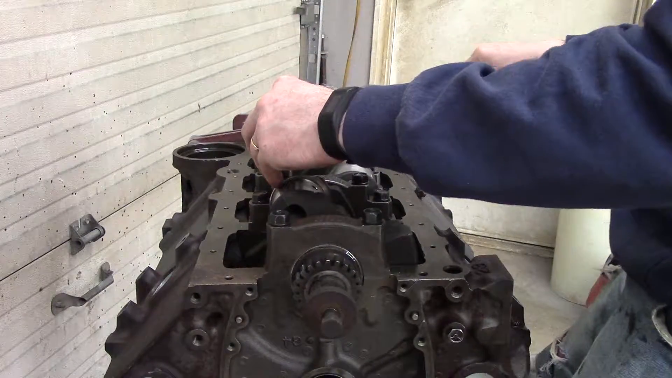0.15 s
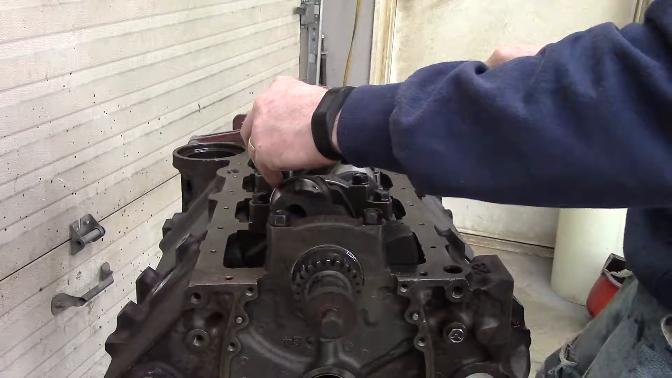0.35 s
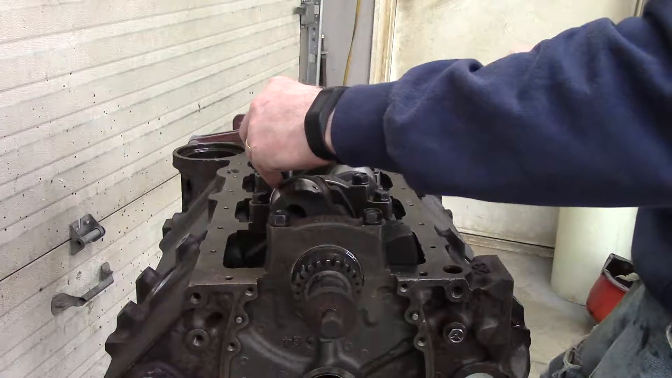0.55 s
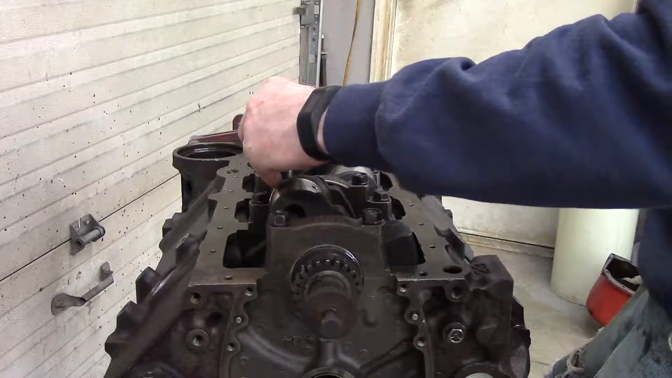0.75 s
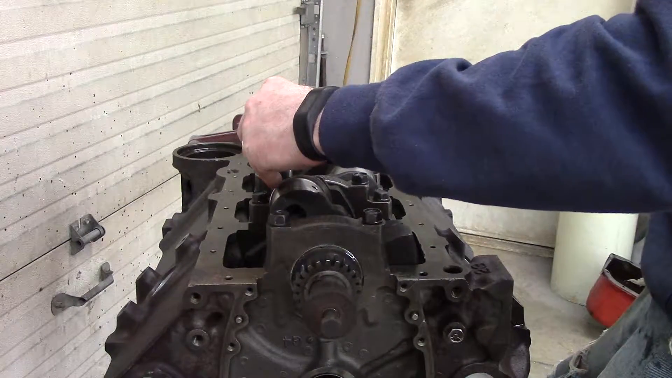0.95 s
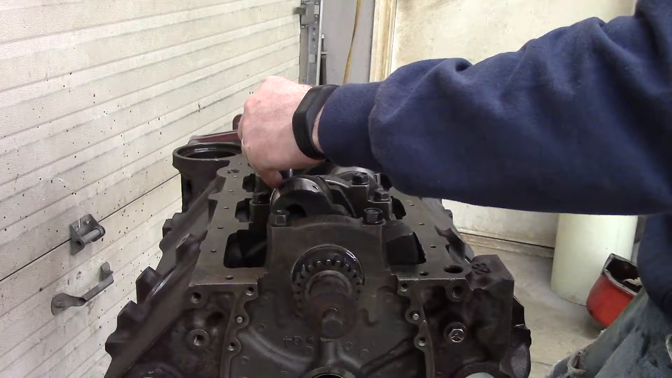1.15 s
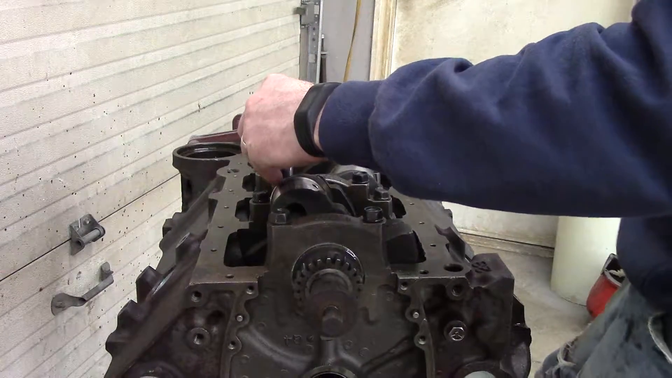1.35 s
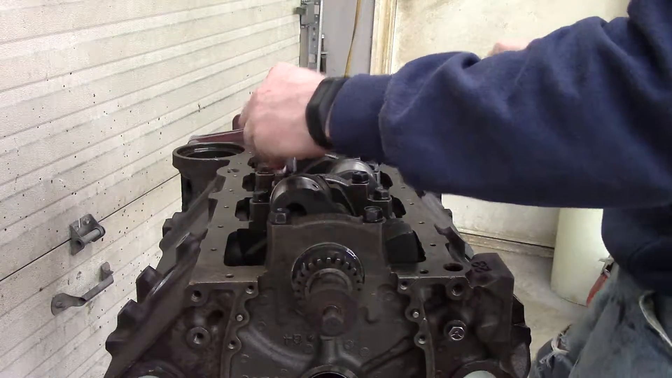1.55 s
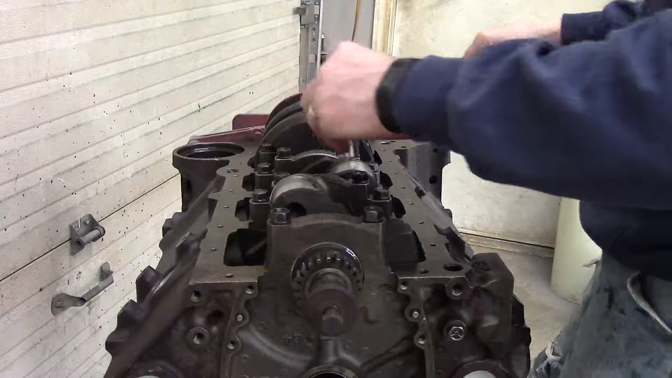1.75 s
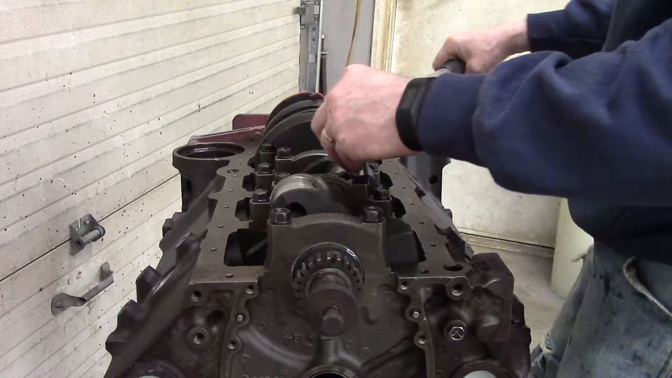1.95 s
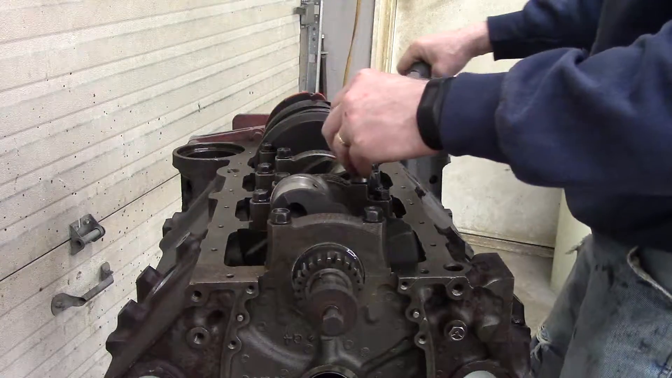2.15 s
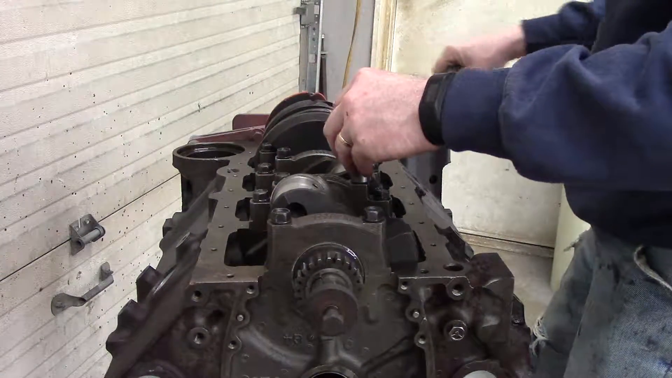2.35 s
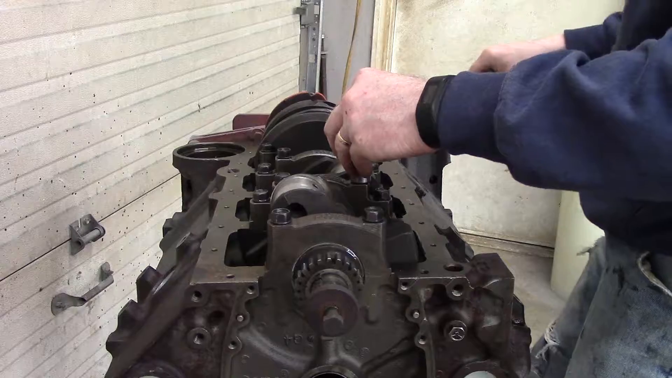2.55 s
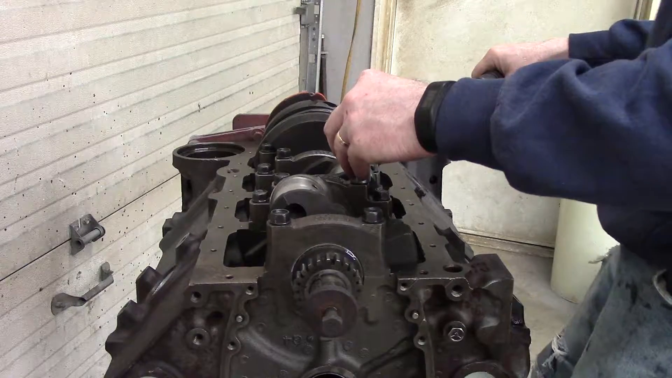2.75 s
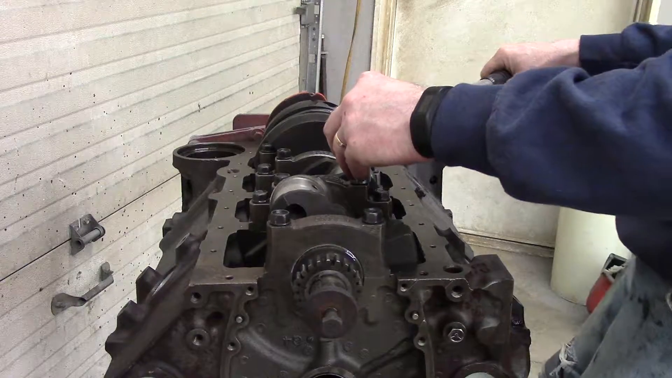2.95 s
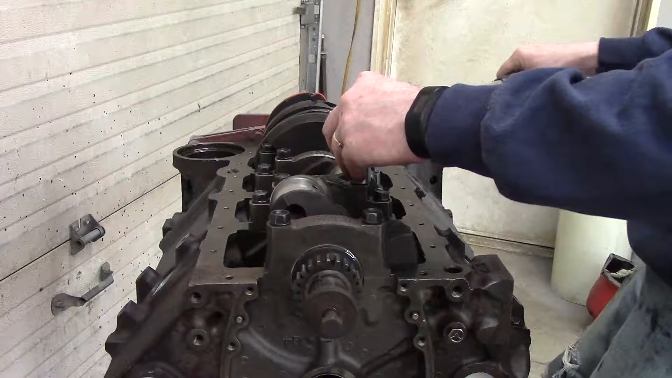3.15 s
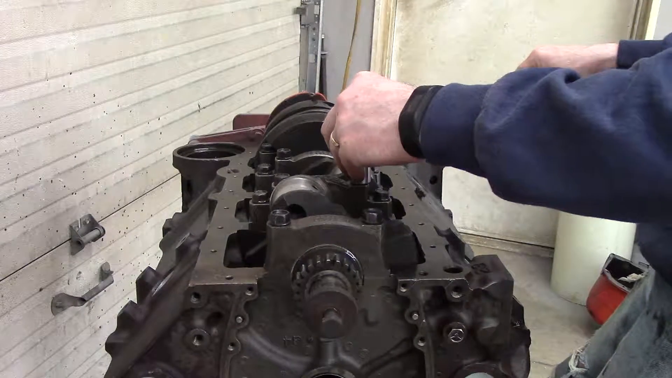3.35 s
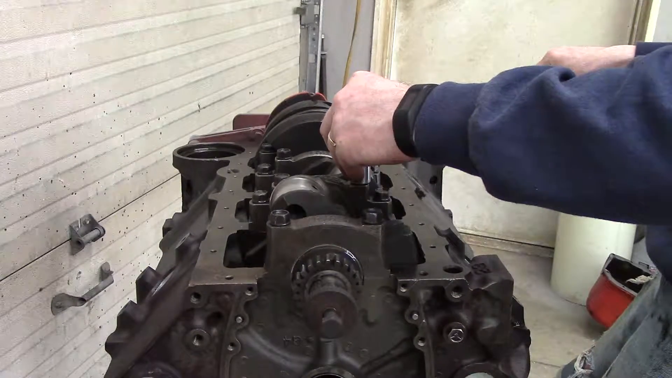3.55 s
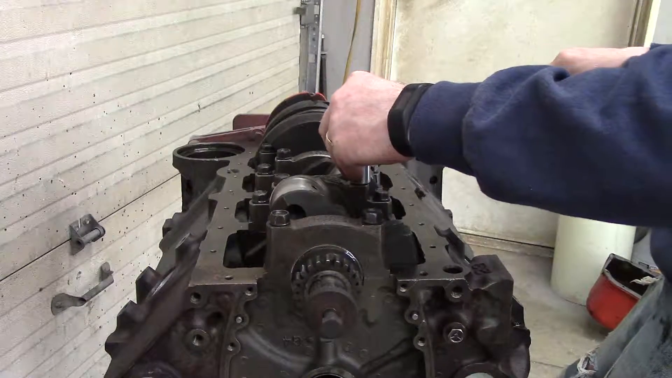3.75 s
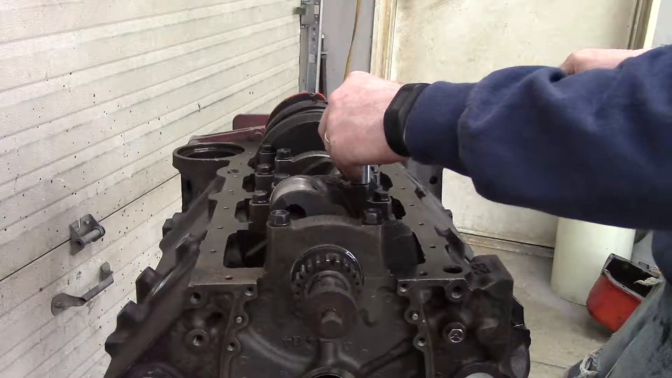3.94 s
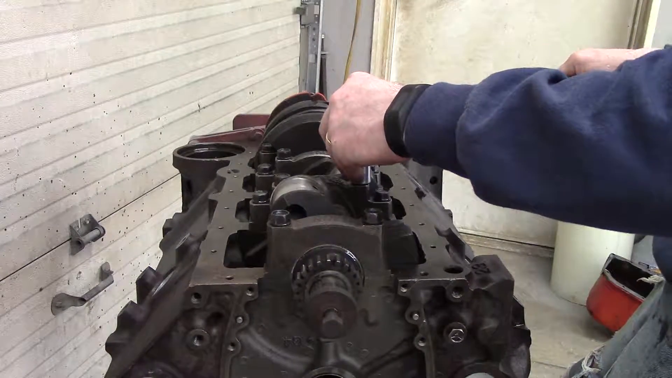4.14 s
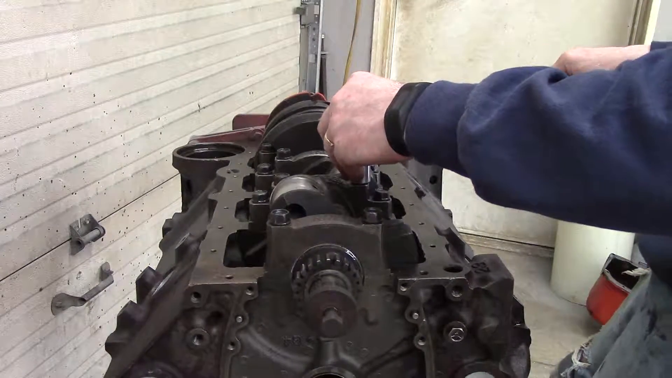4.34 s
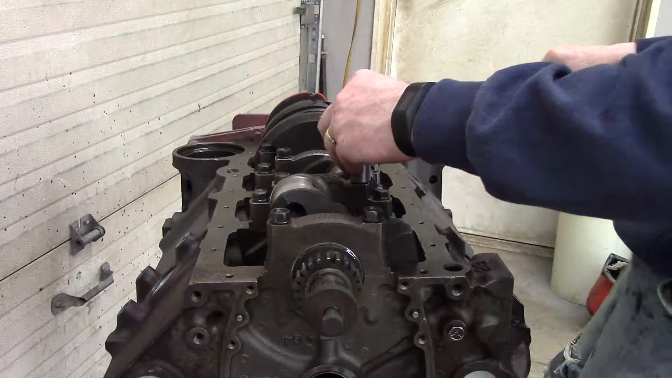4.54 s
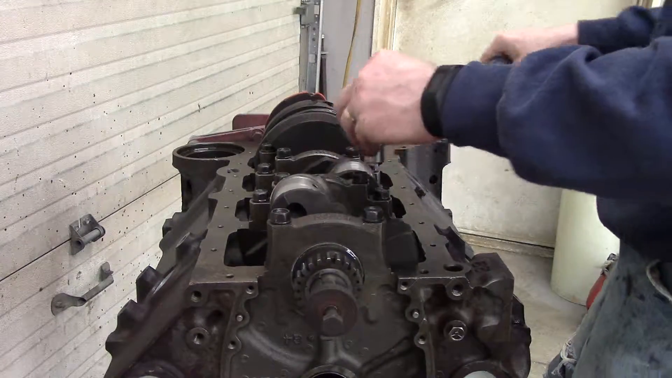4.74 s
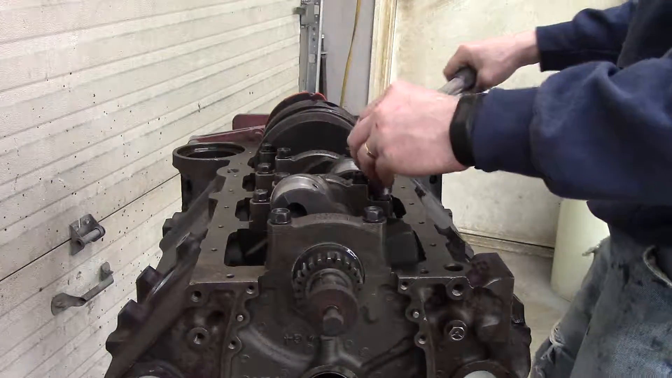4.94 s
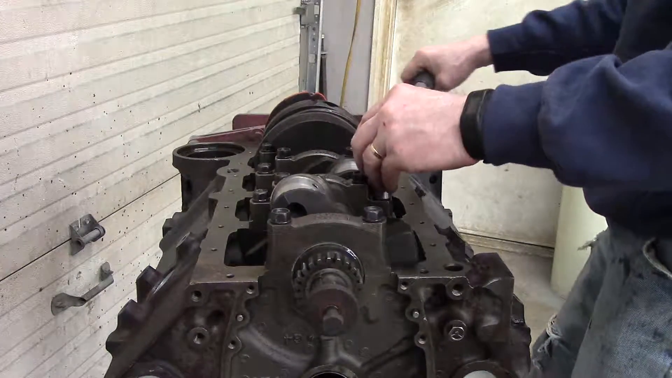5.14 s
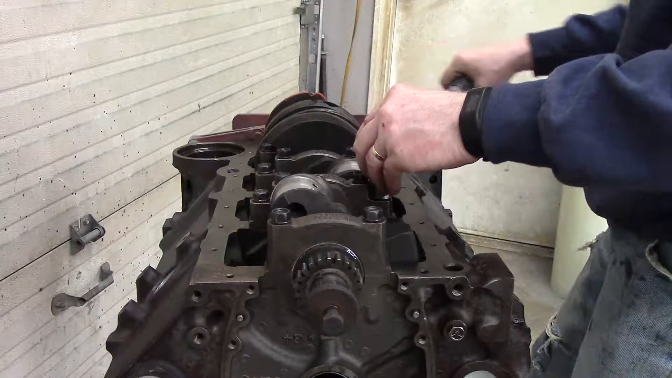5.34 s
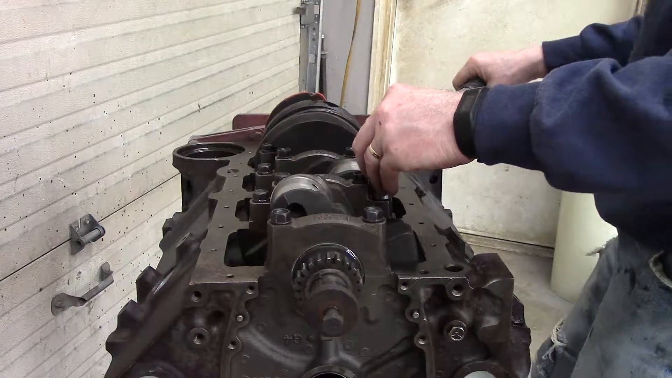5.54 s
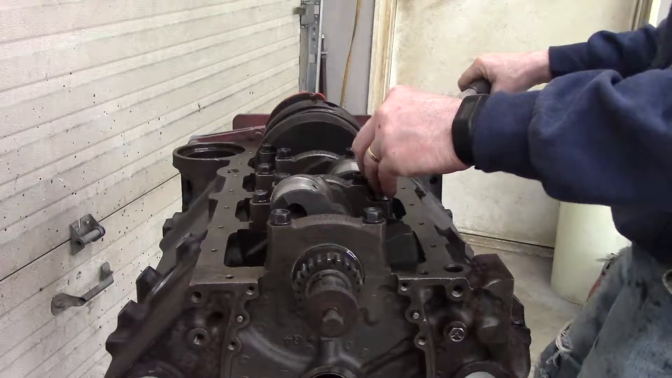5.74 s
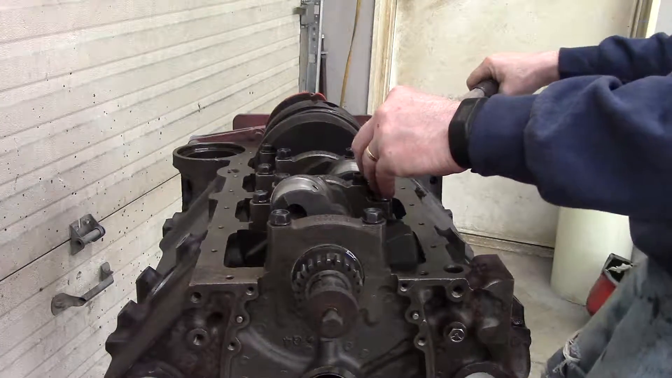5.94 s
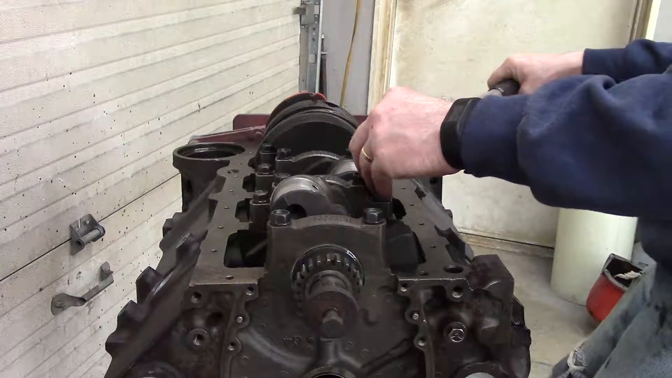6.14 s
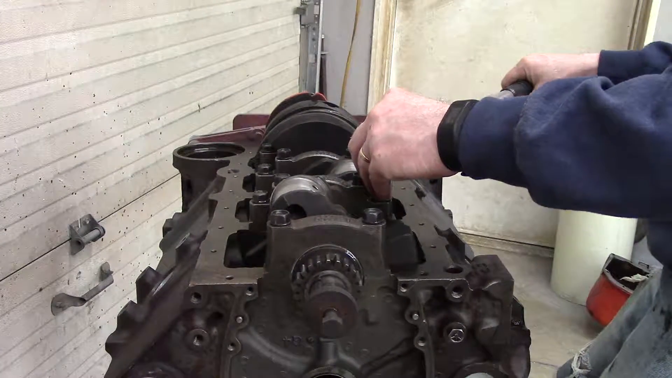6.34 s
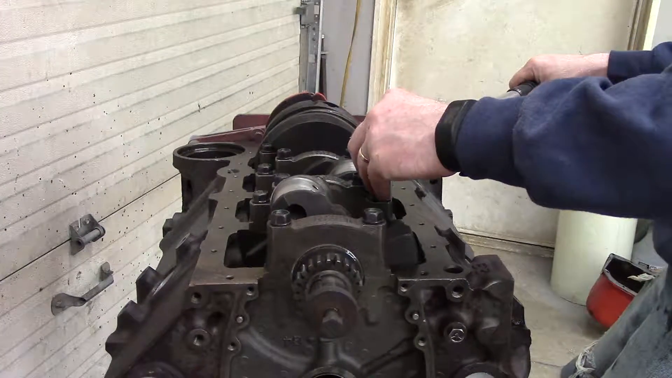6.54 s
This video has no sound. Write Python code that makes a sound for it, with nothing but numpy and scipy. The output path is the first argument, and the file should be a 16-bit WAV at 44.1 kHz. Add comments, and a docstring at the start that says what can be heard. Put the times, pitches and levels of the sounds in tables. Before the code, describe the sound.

Quiet room air with a faint electrical hum and a thin, intermittent high whine. A steel click bursts out, followed by a brighter, louder return clack, both with short garage echo. Soft clinks of the socket settling on a bolt, a long pause, then another click pair, some fumbling taps, and a final click whose echo is cut short. Near, mostly centred microphone.

```python
"""Torque wrench on an engine block

A click-type torque wrench tightens bolts on an iron block in a bare garage.
At full torque the pawl trips with a crack, then snaps back as the hand lets go; the socket taps the next bolt.
Each blow is a noise rattle plus struck steel resonances, echoed by decaying noise and a slow low tone.
Below lie shaped air noise, wavering lamp harmonics and a thin whine, pulsed or held.
"""
import sys
import numpy as np
from scipy import signal
from scipy.fft import rfft, irfft, next_fast_len
from scipy.io import wavfile
from scipy.ndimage import uniform_filter1d, minimum_filter1d, map_coordinates

SR = 44100
rng = np.random.default_rng(int(sys.argv[2]) if len(sys.argv) > 2 else 0)


def pcm_store(signal):
    """Save signal as 16-bit PCM."""
    levels = np.round(np.clip(np.atleast_2d(signal), -1, 1) * 32767)
    wavfile.write(sys.argv[1], SR, levels.astype(np.int16).T)


N = 295029

# Steady air noise, relative spectrum: (frequency [Hz], level [dB])
AIR_SPECTRUM = [(12, -64), (20, -32.5), (108, -8.5), (189, -15.5), (230, -10.5), (323, -8.5), (380, -9.5),
                (1400, -18), (1590, -12), (1750, -20), (3420, -24.5), (6000, -27), (10000, -34),
                (15200, -36), (16500, -44.5)]
# Stereo spread of the air noise: (frequency [Hz], side minus mid [dB])
AIR_SPREAD = [(60, -21), (110, -8), (200, -3), (380, -9), (700, -4.5), (1290, -8.5), (2380, -6),
              (4400, -11.5), (8120, -10.5), (15000, -9.5)]
# Lamp harmonics before wavering: (frequency [Hz], level [dB rms])
LAMP_HARMONICS = [(119.5, -82), (360, -72.5), (479, -78.5), (598, -76), (840, -81)]
# Spells of whine: (start [s], end [s], level against a clear pulse [dB], 1 pulsing or 0 held)
WHINE_SPELLS = [(0, .04, -7, 1), (.05, .26, 0, 1), (.28, .4, -8, 1), (.43, .56, 0, 1), (.6, .79, -9, 0),
                (.8, 1, 0, 1), (1.73, 1.9, -6, 0), (2.38, 2.51, 0, 1), (2.53, 2.72, -7, 0), (2.9, 4, -1, 1),
                (4.85, 4.95, -3, 0), (5.76, 5.95, -8, 0), (5.99, 6.11, 0, 1), (6.14, 6.27, -8, 1),
                (6.29, 6.41, 0, 1)]
# Pawl trips under load: (time [s], level [dB])
PAWL_TRIPS = [(0.849, -13.5), (3.963, -14), (6.441, -14)]
# Pawl snaps back: (time [s], level [dB])
PAWL_RESETS = [(1.285, -8.5), (4.334, -9.5)]
# Socket on bolt, a slow rise is a sliding contact:
# (time [s], level [dB], rise [s], clank frequency [Hz], clank gain [dB])
SOCKET_TAPS = [(1.587, -40.5, 0.0084, 3020, -1), (1.947, -38, 0.00052, 3360, 8.5),
               (2.059, -36, 0.00096, 3410, 11.5), (2.084, -30.5, .0007, 3420, 2.5),
               (2.397, -56, .002, 3350, 6), (2.505, -59.5, 0.0052, 1900, -3),
               (2.531, -65, 0.00091, 10600, 42), (4.684, -42.5, 0.01, 1980, 4),
               (4.946, -30.5, .001, 930, 6), (4.975, -36.5, .012, 1850, 5),
               (5.097, -30.5, 0.00044, 1830, -15), (5.434, -51, 0.00068, 830, 20)]
# Resonances of the wrench bent on the bolt: (frequency [Hz], width [Hz], gain [dB])
LOADED_MODES = [(55, 50, -30), (455, 30, -12), (610, 40, -13), (770, 30, -11), (1040, 130, -4),
                (1091, 6, 5), (1710, 45, -8), (2200, 140, 1), (2235, 10, 5), (2430, 40, -4),
                (3080, 190, -5), (4230, 120, -6), (4300, 8, 2), (4590, 120, -9), (5785, 25, -3),
                (6180, 60, -8), (6440, 100, -7), (6900, 120, -11), (8770, 100, -19), (10605, 8, -5),
                (11000, 90, -15), (12200, 90, -21)]
# Resonances of the unloaded wrench: (frequency [Hz], width [Hz], gain [dB])
SLACK_MODES = [(70, 70, -29), (460, 30, -12), (770, 35, -12), (1010, 100, -5), (1340, 30, -10),
               (1940, 160, 1), (1900, 8, 5), (2430, 50, -5), (2810, 40, -6), (3300, 70, -7), (3600, 70, -5),
               (4640, 100, -4), (5260, 90, -5), (5760, 40, -7), (6300, 150, -7), (6510, 40, -1),
               (7300, 150, -11), (8160, 90, -14), (9050, 120, -16), (10585, 12, -17), (10950, 100, -18)]
# Resonances of the socket: (frequency [Hz], width [Hz], gain [dB])
SOCKET_MODES = [(940, 35, -2), (1910, 70, -3), (2420, 60, -3), (2925, 40, -5), (3400, 60, -3),
                (3865, 60, -5), (4550, 110, -5), (5790, 60, -7), (6220, 120, -7), (10600, 30, -20)]
# Pawl impact, relative spectrum before tilt: (frequency [Hz], level [dB])
PAWL_IMPACT = [(88, -59.5), (150, -27), (798, -10.5), (1030, -5), (1470, -14), (1930, -4), (2350, -9.5),
               (4250, -9), (4870, -13.5), (6290, -9), (9700, -23), (12300, -22), (15300, -41), (16500, -41)]
# Socket impact, relative spectrum before tilt: (frequency [Hz], level [dB])
SOCKET_IMPACT = [(290, -68), (500, -8.5), (810, -12), (937, -3.5), (1120, -6), (1860, 1), (2760, -4),
                 (3390, -2), (4880, -7), (6350, -9), (12100, -30.5), (16400, -80)]
# Garage decay: (frequency [Hz], time to fall 60 dB [s])
GARAGE_T60 = [(150, 0.36), (500, 0.68), (1500, 0.56), (4000, 0.65), (8000, 0.49), (15000, 0.3)]
# Stereo spread of blows and echoes: (frequency [Hz], side minus mid [dB])
BLOW_SPREAD = [(60, -17.5), (110, -9.5), (200, -18), (380, -9.5), (700, -22.5), (1290, -26), (2380, -17),
               (4400, -16.5), (8120, -12.5), (15000, -27)]

AIR_DB = -60  # rms of the mid signal
WHINE_HZ, WHINE_DB, WHINE_BETWEEN_DB = 5561, -70, -20  # clear-pulse rms; floor relative to it
PAIR_PERIOD_S, FIRST_PAIR_S, SECOND_PULSE_S, PULSE_S = 0.1502, 0.14, 0.068, 0.04
PAWL_RISE_S, PAWL_RATTLE_S = 0.0003, 0.055  # rattle: time to fall 60 dB
SOCKET_RATTLE_S, DRAG = 0.06, 2.5  # rattle lengthens by DRAG times the rise
FIRM_TAP_DB, FIRM_TILT_DB_PER_OCT, TILT_PER_DB = -31, 2, 0.3
SHARP_RISE_S = 0.002  # a slower rise rings the steel less
BOOM_HZ, BOOM_T60_S, BOOM_RISE_S = 199, 0.6, 0.037
PEAK_LIMIT, TOP_HZ = 0.88, 16350


def amp(db):
    """Decibels to amplitude."""
    return 10 ** (np.asarray(db) / 20)


def unit(x):
    """Scale to rms 1."""
    return x / np.sqrt(np.mean(x ** 2) + 1e-20)


def along(points, hz):
    """Interpolate (frequency, value) points on a log axis."""
    f, v = np.transpose(points)
    return np.interp(np.log(hz + 1), np.log(f + 1), v)


def filtered(x, response):
    """Multiply the spectrum of x by a complex response of frequency."""
    n = x.shape[-1]
    m = next_fast_len(2 * n)
    spectrum = rfft(x, m) * response(np.fft.rfftfreq(m, 1 / SR))
    return irfft(spectrum, m)[..., :n]


def causal(db):
    """Minimum-phase response with the given gain, so nothing sounds before the blow."""
    cepstrum = irfft(np.log(amp(np.maximum(db, -120))))
    half = len(cepstrum) // 2
    folded = np.r_[cepstrum[0], 2 * cepstrum[1:half], np.zeros(len(cepstrum) - half)]
    return np.exp(rfft(folded))


def left_right(pair, spread):
    """Mid and side to left and right, the side weighted by frequency."""
    mid = pair[0]
    side = filtered(pair[1], lambda hz: amp(along(spread, hz)))
    return np.array([mid + side, mid - side])


def wobble(rate_hz):
    """Smooth random curve through rate_hz knots a second."""
    knots = rng.standard_normal(int(N * rate_hz / SR) + 4)
    return map_coordinates(knots, [np.arange(N) * rate_hz / SR])


def tone(hz, rms_db):
    """Steady sine of random phase."""
    t = np.arange(N) / SR
    return np.sqrt(2) * amp(rms_db) * np.sin(2 * np.pi * (hz * t + rng.random()))


def air():
    """Shaped wide noise whose level is faintly patchy over time and frequency."""
    z = signal.stft(rng.standard_normal((2, N)), nperseg=512)[2]
    patches = uniform_filter1d(rng.standard_normal(z.shape[1:]), 6, 0)
    patches = uniform_filter1d(patches, 14, 1)
    pair = signal.istft(z * amp(0.9 * unit(patches)), nperseg=512)[1][:, :N]
    pair = filtered(pair, lambda hz: amp(along(AIR_SPECTRUM, hz)))
    return amp(AIR_DB) * left_right(pair / np.std(pair[0]), AIR_SPREAD)


def lamp_hum():
    """Lamp harmonics, each wavering in level on its own."""
    return sum(amp(2.5 * wobble(12)) * tone(hz, db) for hz, db in LAMP_HARMONICS)


def whine():
    """Thin tone in spells, pulsing in pairs or held, over a faint steady remainder."""
    t = np.arange(N) / SR
    phase_s = (t - FIRST_PAIR_S) % PAIR_PERIOD_S
    first = phase_s < PULSE_S
    second = (phase_s > SECOND_PULSE_S) & (phase_s < SECOND_PULSE_S + PULSE_S)
    pulses = first | second
    strength = np.zeros(N)
    for start, end, db, pulsing in WHINE_SPELLS:
        inside = (t > start) & (t < end)
        strength += amp(db) * inside * (pulses if pulsing else 1)
    spells = uniform_filter1d(strength, size=SR // 150) * amp(1.2 * wobble(20))
    return (amp(WHINE_BETWEEN_DB) + spells) * tone(WHINE_HZ, WHINE_DB)


def echoes():
    """Garage tail: noise, each frequency dying at its own speed, the mid at energy 1."""
    hz, t, z = signal.stft(rng.standard_normal((2, SR)), SR, nperseg=256)
    decay = amp(-60 * t / along(GARAGE_T60, hz)[:, None])
    tail = signal.istft(z * decay, SR, nperseg=256)[1][:, :SR]
    tail = tail * (1 - np.exp(-np.arange(SR) / SR / 0.00043))  # the walls take a moment to answer
    return left_right(tail / np.linalg.norm(tail[0]), BLOW_SPREAD)


def boom(db):
    """One low tone builds up slowly after the blow, as a large panel would."""
    t = np.arange(SR) / SR
    swell = (1 - np.exp(-t / BOOM_RISE_S)) ** 2
    return amp(db - 60 * t / BOOM_T60_S) * swell * np.sin(2 * np.pi * BOOM_HZ * t)


def resonance(f, center_hz, width_hz):
    """Power response of one resonance, 1 at its center."""
    damping = (f * width_hz) ** 2
    return damping / ((center_hz ** 2 - f ** 2) ** 2 + damping)


def blows(events, modes, impact, ring_db, steel_db, room_db, boom_db):
    """Each blow is a short rattle of steel that cracks, rings the tool and fills the garage."""
    out, t = np.zeros((2, N + 2 * SR)), np.arange(SR // 2) / SR
    for s, db, tilt_db, rise_s, rattle_s, clank_hz, clank_db in events:
        shape = amp(-60 * (t / rattle_s) ** 1.5) * (1 - np.exp(-t / rise_s)) ** 2
        peak = np.argmax(shape)

        def tilted(f, power):
            octaves = np.log2(np.clip(f, 300, 16000) / 2500)
            return causal(10 * np.log10(power + 1e-12) + tilt_db * octaves)

        def broad(f):
            return amp(along(impact, f)) ** 2

        def tones(f):
            ring = sum(amp(ring_db + gain) ** 2 * resonance(f, c, w) for c, w, gain in modes)
            # where the blow lands decides which resonance clanks most
            clank = amp(clank_db) ** 2 * resonance(f, clank_hz, 0.038 * clank_hz + 30)
            return ring + broad(f) * clank

        rattle = rng.standard_normal((2, len(t))) * shape
        crack = filtered(rattle, lambda f: tilted(f, broad(f)))
        # all the blow's energy in one instant
        push = np.zeros(len(t))
        push[peak] = np.linalg.norm(shape)
        steel = filtered(push, lambda f: tilted(f, tones(f)))
        # ringing carries further than the crack
        whole = filtered(push, lambda f: tilted(f, amp(-12.5) * broad(f) + tones(f)))

        scale = amp(db) / np.std(whole[peak:][:SR // 100])  # level over the first 10 ms
        steel_gain = amp(steel_db) * min(1, SHARP_RISE_S / rise_s)
        mid, side = crack[0] + steel_gain * steel, amp(-1.0) * crack[1]
        near = scale * left_right([mid, side], BLOW_SPREAD)
        far = scale * amp(room_db) * signal.fftconvolve(whole[None], echoes(), axes=1)
        i = round(s * SR)
        out[:, i:i + len(t)] += near
        out[:, i:i + far.shape[1]] += far
        out[:, i:i + SR] += boom(db + boom_db)
    return out[:, :N]


def pawl(hits, tilt_db_per_oct, clank_hz, clank_db):
    """Every click of one kind has the same tilt, rise and clank."""
    return [(s, db, tilt_db_per_oct, PAWL_RISE_S, PAWL_RATTLE_S, clank_hz, clank_db) for s, db in hits]


def pawl_trips():
    """The pawl trips at full torque and rings the wrench bent on the bolt."""
    events = pawl(PAWL_TRIPS, tilt_db_per_oct=0.7, clank_hz=2215, clank_db=-2.3)
    return blows(events, LOADED_MODES, PAWL_IMPACT, ring_db=-3.5, steel_db=0, room_db=-0.5, boom_db=-25.0)


def pawl_resets():
    """The pawl snaps back and rings the unloaded wrench."""
    events = pawl(PAWL_RESETS, tilt_db_per_oct=1.1, clank_hz=1925, clank_db=-2)
    return blows(events, SLACK_MODES, PAWL_IMPACT, ring_db=-0.5, steel_db=-2, room_db=-5.5, boom_db=-31.0)


def socket_taps():
    """Socket on bolt: a harder tap is brighter; a sliding one rattles longer."""
    events = []
    for s, db, rise_s, clank_hz, clank_db in SOCKET_TAPS:
        tilt_db = FIRM_TILT_DB_PER_OCT + TILT_PER_DB * (db - FIRM_TAP_DB)
        rattle_s = SOCKET_RATTLE_S + DRAG * rise_s
        events.append((s, db, tilt_db, rise_s, rattle_s, clank_hz, clank_db))
    return blows(events, SOCKET_MODES, SOCKET_IMPACT, ring_db=3.0, steel_db=0.0, room_db=-2.5, boom_db=-34.5)


def scene():
    """Sum all sources, the right slightly louder than the left."""
    floor = air() + lamp_hum() + whine()
    wrench = pawl_trips() + pawl_resets() + socket_taps()
    return (floor + wrench) * amp([[-0.15], [0.15]])


def record(dry):
    """A quick limiter holds the peaks down; a steep low-pass sets the band limit."""
    need = np.minimum(1, PEAK_LIMIT / (np.max(np.abs(dry), axis=0) + 1e-9))
    gain = uniform_filter1d(minimum_filter1d(need, size=181), size=91)
    return filtered(dry * gain, lambda hz: 1 / (1 + (hz / TOP_HZ) ** 160))


dry = scene()
out = record(dry)
pcm_store(out)
```